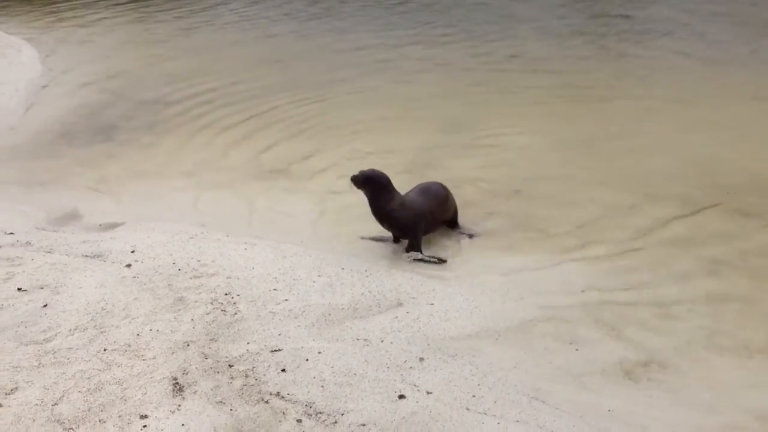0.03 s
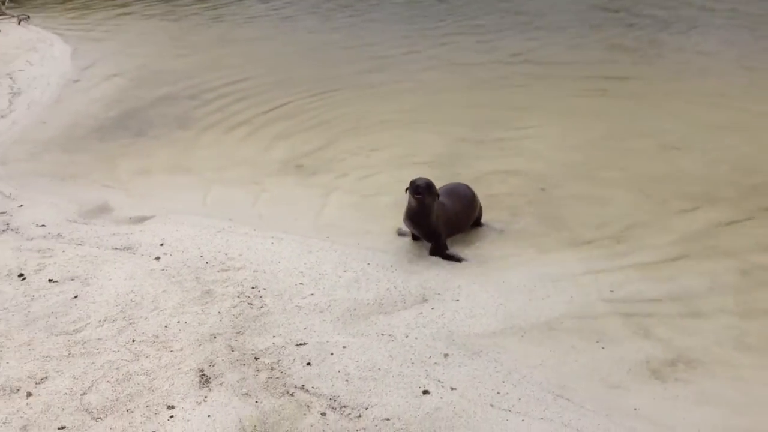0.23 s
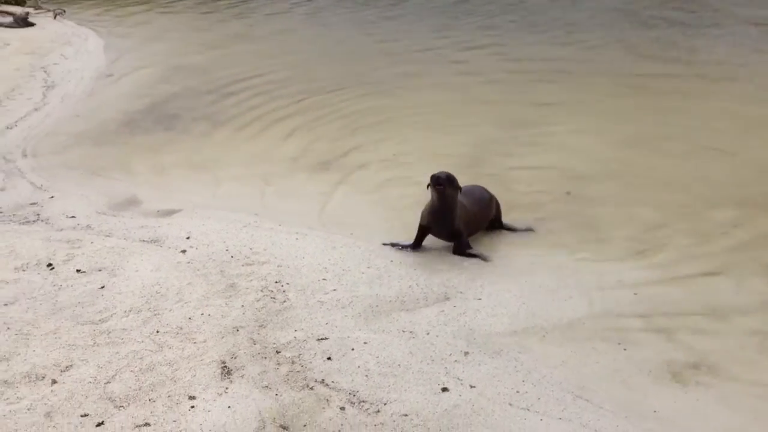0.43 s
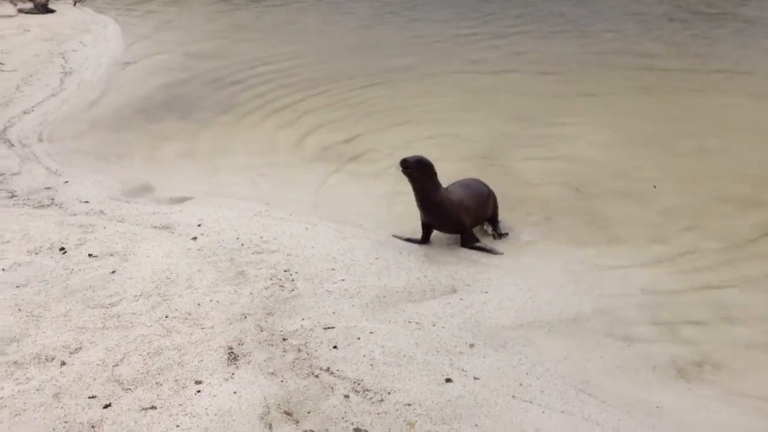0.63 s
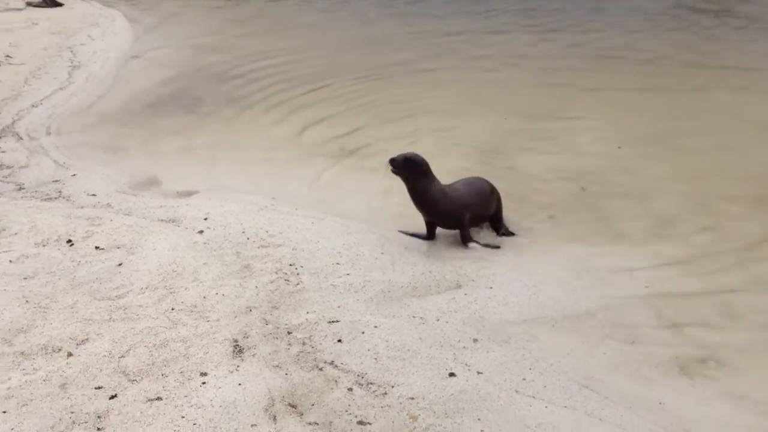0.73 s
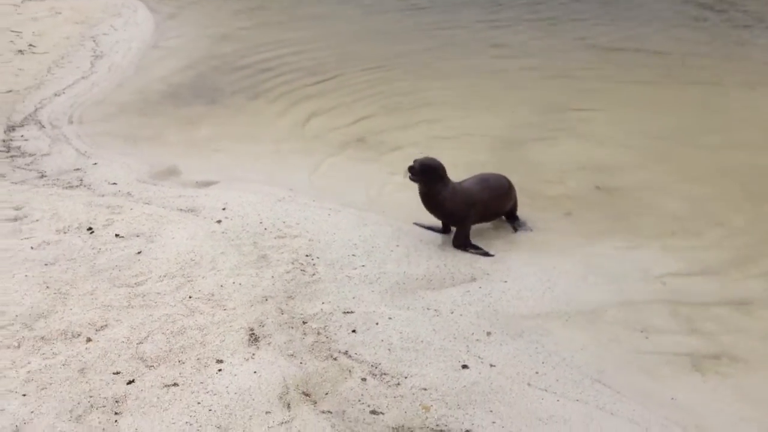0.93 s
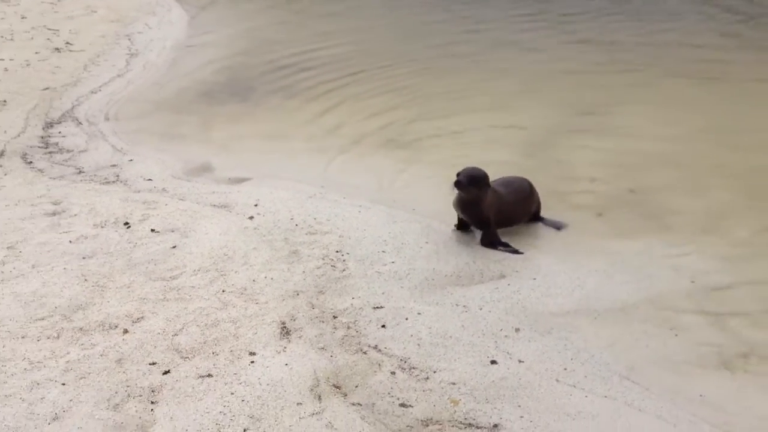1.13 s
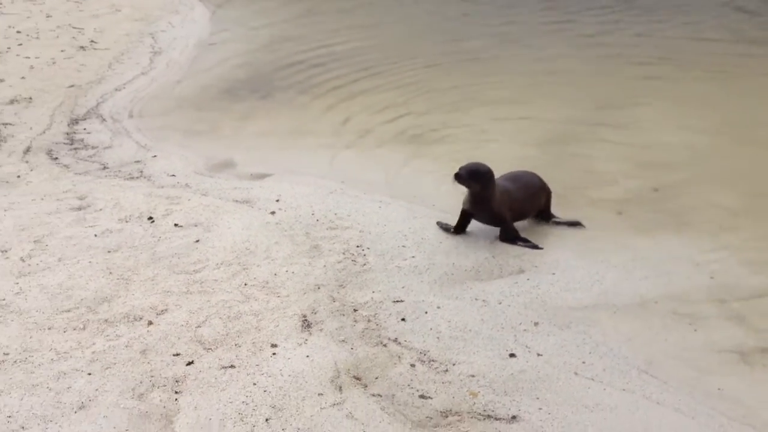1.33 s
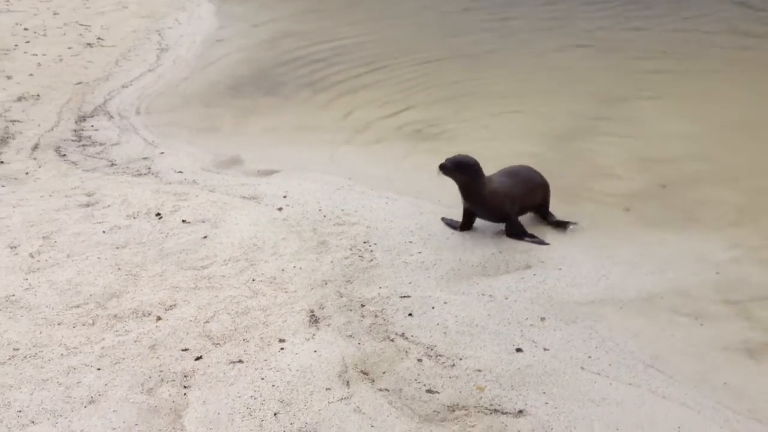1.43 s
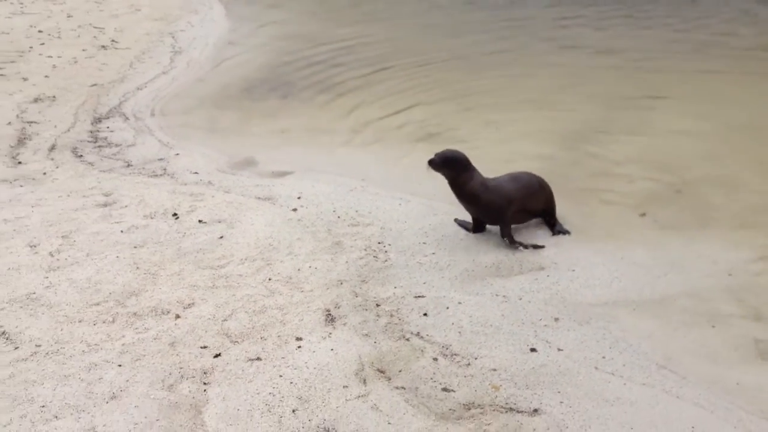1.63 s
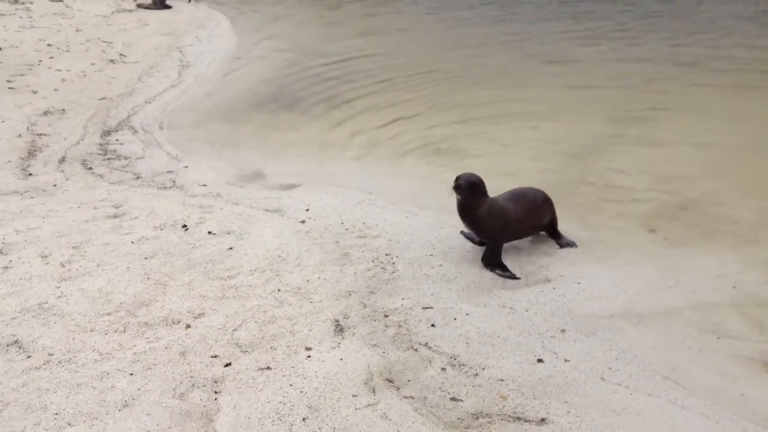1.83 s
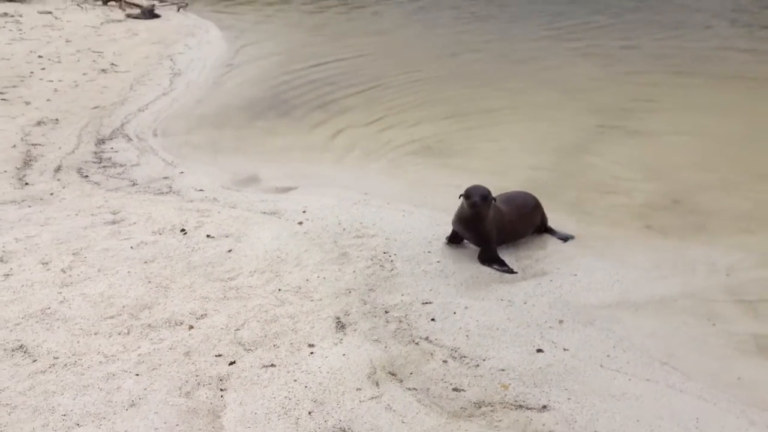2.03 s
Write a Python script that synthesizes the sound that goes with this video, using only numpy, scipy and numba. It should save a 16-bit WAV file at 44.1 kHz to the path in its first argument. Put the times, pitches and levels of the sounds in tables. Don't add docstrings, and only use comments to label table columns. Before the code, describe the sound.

After a tiny splash and drips, a young sea lion lets out one loud, nasal, goat-like bleat that turns hoarse and stops abruptly; soft watery swishes follow on a calm shore, low surf behind, pocket camera microphone.

```python
import sys
import numpy as np
from scipy import signal
from scipy.fft import rfft, irfft
from scipy.io import wavfile
from scipy.ndimage import uniform_filter1d, map_coordinates
from numba import njit

SR = 44100
rng = np.random.default_rng(int(sys.argv[2]) if len(sys.argv) > 2 else 0)


def master_out(mix):
    frames = np.transpose(np.atleast_2d(mix))
    ceiling = np.clip(frames, -1, 1)
    pcm = np.round(ceiling * 32767).astype(np.int16)
    wavfile.write(sys.argv[1], SR, pcm)


def elevation(decibels):
    levels = np.asarray(decibels, float)
    return 10 ** (levels / 20)


N = 92610


def unit(x):
    return x / np.sqrt(np.mean(x ** 2) + 1e-20)


def curves(rows, quiet=None):
    s, *cols = np.transpose(rows)
    t = np.arange(N) / SR
    cols = [np.interp(t, s, c) for c in cols]
    if quiet is not None:
        cols[quiet] = np.where((t < s[0]) | (t > s[-1]), -120, cols[quiet])
    return cols


def wobble(rate):
    return map_coordinates(rng.standard_normal(N // 50), [np.arange(N) * rate / SR])


def coloured(spectrum, patchy_db):
    hz, _, z = signal.stft(rng.standard_normal(N), SR, nperseg=1024)
    patches = uniform_filter1d(rng.standard_normal(z.shape), 8, 0)
    patches = unit(uniform_filter1d(patches, 4, 1))
    f, db = np.transpose(spectrum)
    shape_db = np.interp(np.log(hz + 1), np.log(f + 1), db)[:, None]
    _, noise = signal.istft(z * elevation(shape_db + patchy_db * patches), nperseg=1024)
    return unit(noise[:N])


def plinks(s, db, hz, t60, rise):
    t = np.arange(SR // 30)[None] / SR
    s, db, hz, t60 = (np.asarray(v)[:, None] for v in (s, db, hz, t60))
    envelope = elevation(db - 60 * t / t60) * (1 - np.exp(-t * hz / 2))
    ring = envelope * np.sin(2 * np.pi * hz * t * (1 + rise * t / t60))
    at = np.round((s + t) * SR).astype(int)
    return np.bincount(at.ravel(), ring.ravel(), N + SR)[:N]


def surf():
    # time in seconds, level in dB.
    swell = [ [(0.0, -46), (0.172, -46), (0.18, -47)], ][0] + [ [(1.1, -44), (1.16, -44), (1.544, -43),
             (1.916, -42), (2.1, -43.5)], ][0]
    # frequency in Hz, level in dB per Hz.
    roar = [(15, -79), (25, -16.5), (210, -0.5), (872, -20), (1080, -20), (1850, -23.5), (5020, -33.5),
            (12900, -39), (15500, -43)]
    db, = curves(swell)
    return elevation(db + 0.24 * wobble(8.2)) * coloured(roar, patchy_db=1.0)


def shallows():
    # start in seconds, length in seconds, fizz level in dB, airy spray level in dB.
    swishes = [
        (0.045, 0.21, -56, -105),
        (1.002, 0.23, -49, -54.5),
        (1.241, 0.49, -52, -55),
        (1.677, 0.2, -68, -51),
        (1.947, 0.15, -63, -57.5),
    ]
    # start in seconds, peak level in dB, pitch in Hz, decay by 60 dB in seconds.
    drips = [(.016, -39, 900, 0.033), (0.049, -34, 1530, 0.0092), (0.091, -37, 2680, 0.031),
             (0.093, -37, 5170, 0.0045), (0.098, -24, 990, 0.0087), (1.152, -23, 2034, 0.011),
             (1.165, -26, 357, 0.056), (1.178, -32.5, 2460, 0.011), (1.222, -29, 372, .05),
             (1.2444, -45, 4180, 0.014), (1.506, -31, 2720, 0.0059), (1.525, -34, 2720, 0.0077),
             (1.687, -27, 2560, 0.0048), (1.697, -23, 7800, 0.0012), (1.993, -41.5, 2480, .02)]
    # frequency in Hz, level in dB per Hz.
    fizz = [(900, 2), (1800, -5), (2800, 1.5), (4500, -7.5), (8700, -3), (15500, -59)]
    spray = [(3000, -34), (6000, 11.5), (12000, 5.5), (15500, 9.5)]
    bubbles_per_s, bubble_hz, bubble_db = 1200, 3000, -15

    t = np.arange(N) / SR
    swell = [np.sin(np.pi * np.clip((t - s) / length, 0, 1) ** 0.66) ** 2 for s, length, *_ in swishes]
    stir, air = elevation(np.transpose(swishes)[2:]) @ swell

    start, pitch, size, ringing = rng.random((round(bubbles_per_s * N / SR), 4)).T
    hz = bubble_hz * np.exp(1.94 * (pitch - .5))
    bubbles = plinks(start * N / SR, -2.5 * np.log(size), hz, (6 + 14 * ringing) / hz, rise=0.34)

    water = stir * (coloured(fizz, patchy_db=8) + elevation(bubble_db) * unit(bubbles))
    return water + air * coloured(spray, patchy_db=2.5) + plinks(*np.transpose(drips), rise=0.0094)


def squeak_and_moan():
    # start in seconds, length in seconds, from Hz, to Hz, level in dB.
    squeak_rows = [
        (.192, .024, 1380, 1610, -41),
        (.953, .03, 2060, 1970, -37),
        (1.038, .014, 1950, 1900, -39),
    ]
    # time in seconds, pitch in Hz, level in dB.
    moan = [(.43, 250, -54), (.47, 250, -47), (.54, 276, -45), (.588, 278, -36), (.66, 277, -40),
            (.70, 270, -49), (.74, 283, -44), (.81, 283, -46), (.88, 240, -52)]

    s, length, from_hz, to_hz, db = np.transpose(squeak_rows)[..., None]
    u = np.clip((np.arange(N) / SR - s) / length, 0, 1)
    hz = from_hz + (to_hz - from_hz) * np.clip(2 * u, 0, 1)
    envelope = elevation(db) * np.sqrt(np.abs(np.sin(np.pi * u))) * (u < 1)
    squeaks = envelope * np.sin(2 * np.pi * np.cumsum(hz, axis=1) / SR)

    low_hz, low_db = curves(moan, quiet=1)
    low = elevation(low_db + 1.2 * wobble(33.5)) * np.sin(2 * np.pi * np.cumsum(low_hz) / SR)
    return np.sqrt(2) * (squeaks.sum(axis=0) + low)


def whistle():
    # time in seconds, pitch in Hz, level in dB.
    held_line = [(.62, 684, -50), (.634, 735, -41), (.682, 752, -29), (.702, 770, -38), (.744, 756, -34),
                 (.768, 759, -41), (.784, 763, -35), (.808, 790, -50), (.832, 778, -39), (.856, 779, -42),
                 (.872, 769, -32.5), (.935, 771, -36)]
    falling_line = [(.952, 765, -32), (.966, 675, -41), (.978, 590, -37), (.99, 518, -35),
                    (1.002, 465, -36), (1.025, 428, -36), (1.048, 398, -35.5), (1.062, 385, -41),
                    (1.085, 378, -58)]
    # multiple of the pitch, dB while held, dB falling fast, dB at the end.
    overtones = [(2, -16, -3, 4), (3, -26, -8, 1), (4, -24, -14, -10), (5, -30, -16, -12),
                 (6, -40, -22, -15)]
    held_to_s, fast_s, catch_s, end_s, close_s, shut_s = .948, .96, .986, 1.008, 1.05, 1.075
    catch_db, shut_db = -13, -14

    hz, db = curves([*held_line, *falling_line], quiet=1)
    held, = curves([(held_to_s, 1), (fast_s, 0)])
    phase = 2 * np.pi * np.cumsum(hz * (1 + .011 * (0.27 + held) * wobble(60.35))) / SR
    level = elevation(db + 2.8 * held * wobble(55))

    tone = np.cos(phase)
    for multiple, held_db, fast_db, end_db in overtones:
        overtone_db, = curves([(held_to_s, held_db), (fast_s, fast_db), (catch_s, end_db + catch_db),
                               (end_s, end_db), (close_s, end_db), (shut_s, end_db + shut_db)])
        tone = tone + elevation(overtone_db + 0.42 * wobble(50.6)) * np.cos(round(multiple) * phase)

    closing_db, = curves([(close_s, 0), (shut_s, shut_db / 2)])
    puffs = unit(np.exp(2.7 * np.cos(phase)) * rng.standard_normal(N))
    puff_level = elevation(1 + 0.28 * wobble(63.8)) * level * (1 - held) * elevation(closing_db)
    return np.sqrt(2) * level * tone, puff_level * puffs


def buzz():
    # time in seconds, pulse rate in Hz, level in dB.
    clean = [(0.195, 204.5, -44), (0.249, 184.3, -40), (0.381, 198.3, -34.5), (0.401, 209.5, -35.5),
             (0.453, 205.1, -36), (0.607, 217, -34), (0.623, 221.8, -32)]
    rasp = [(0.637, 222.8, -28), (0.701, 220.8, -31.5), (0.738, 222.1, -33.5), (0.799, 213, -36),
            (0.872, 213.5, -35), (0.949, 211.6, -31), (0.966, 225.6, -28.5), (0.986, 219, -47),
            (0.998, 227.5, -46)]
    # time in seconds, roughness from 0 to 1.
    roughness = [(.19, .6), (.225, .22), (.26, .15), (.39, .13), (.405, .3), (.42, .13), (.61, .13),
                 (.635, .45), (.72, .52), (.78, .75)]
    onset_s, burst_s = .1905, .0013
    jitter, shimmer_db, lump_db = .25, 1, 1.8

    hz, db = curves([(onset_s, *clean[0][1:]), *clean, *rasp], quiet=1)
    rough, = curves(roughness)
    phase = np.cumsum(hz) / SR
    cycles = np.arange(1, int(phase[-1]))
    chance = rng.standard_normal((N // 100, 3))[:len(cycles)]
    at = np.interp(cycles, phase, np.arange(N))
    r = rough[at.astype(int)]
    at = np.clip(at + jitter * r ** 2 * chance[:, 0] * SR / hz[at.astype(int)], 8, N - 10)

    taps = np.floor(at)[:, None] + np.arange(-7, 9)
    offset = taps - at[:, None]
    kernel = np.sinc(offset) * np.cos(np.pi * offset / 16) ** 2

    def train(spread_db):
        return np.bincount(taps.astype(int).ravel(), (kernel * elevation(spread_db)[:, None]).ravel(), N)[:N]

    clicks = train(shimmer_db * chance[:, 1])
    clicks = unit(signal.lfilter(*signal.butter(4, 7500, fs=SR), clicks))

    t = np.arange(SR // 50) / SR
    gate = signal.fftconvolve(train(lump_db * r * chance[:, 2]), t * np.exp(-t / burst_s))[:N]
    bursts = unit(gate * rng.standard_normal(N))
    return elevation(db) * (np.sqrt(1 - rough) * clicks + np.sqrt(rough) * bursts)


@njit
def resonate(x, pole, turn, gain):
    y = np.zeros(len(x))
    for k in range(pole.shape[0]):
        a = b = 0.
        for n in range(2, len(x)):
            r = pole[k, n]
            a, b = (1 - r * r) / 2 * (x[n] - x[n - 2]) + 2 * r * turn[k, n] * a - r * r * b, a
            y[n] += gain[k, n] * a
    return y


def throat(x):
    # time in seconds, mouth shape (0 narrow, 1 drawn, 2 wide, 3 gaping).
    mouth = [(.19, 0.28), (.3, 0.086), (.42, 0.74), (.52, 1.03), (.62, 0.97), (.72, 1.1), (.82, 1.88),
             (.94, 1.93), (.97, 2.75), (1.0, 2.93)]
    # frequency in Hz, width in Hz, level in dB.
    narrow = [(525, 170, -7.5), (900, 64, 5), (1500, 350, -5.5), (1910, 71, 1), (2705, 150, -5.5),
              (3425, 85, -3), (4020, 117, 2), (5350, 810, -5), (7450, 200, -2), (9800, 1300, -19),
              (11700, 1500, -11.5), (13800, 2000, -19)]
    drawn = [(480, 190, -9.5), (734, 60, 6), (1460, 360, -5), (1752, 69, 4), (2570, 360, -6.5),
             (3153, 49, 9), (3810, 140, -2.5), (5730, 1560, -7), (7420, 1020, -7), (9800, 2000, -17),
             (11650, 1100, -15.5), (14400, 2000, -19)]
    wide = [(514, 150, -33), (900, 290, 3.5), (1490, 150, -1.5), (1670, 1430, -1.5), (3000, 660, -1),
            (3190, 150, 6), (4090, 510, -1), (5570, 2400, -9), (7340, 1600, -1), (9200, 1200, -10.5),
            (11070, 1400, -14), (14400, 3000, -24)]
    gaping = [(530, 143, -10), (1240, 650, -5), (1700, 300, -0.5), (2046, 45, 6), (2530, 200, -20),
              (3390, 260, 5), (4173, 1120, -0.5), (5870, 960, -8), (7340, 1400, -7), (9600, 1500, -8.5),
              (10650, 840, -9), (14000, 2400, -16)]
    signs = [1, 1, -1, 1, -1, 1, -1, 1, -1, 1, -1, 1]

    shape, = curves(mouth)
    shapes = np.array([narrow, drawn, wide, gaping])
    hz, width, db = (
        np.array([np.interp(shape, np.arange(len(shapes)), mode) for mode in shapes[..., column].T])
        for column in range(3))
    drift = np.array([[wobble(13.87), wobble(9.27)] for _ in signs])
    hz = hz * (1 + .01 * drift[:, 1])
    width = np.abs(width)
    gain = elevation(db + 1.4 * drift[:, 0]) * np.array(signs)[:, None]
    gain /= np.sqrt(np.sum(gain ** 2 * width * np.pi / SR, 0))
    return resonate(x, np.exp(-np.pi * width / SR), np.cos(2 * np.pi * hz / SR), gain)


def mirrored(x, from_hz, ms):
    bright = signal.sosfiltfilt(signal.butter(3, from_hz, "high", fs=SR, output="sos"), x)
    return map_coordinates(bright, [np.arange(N) - ms * SR / 1000], order=5)


def off_water(x):
    # time in seconds, extra path in ms, mirror level in dB.
    bounce = [(.19, .715, -9), (.3, .715, -6), (.42, .747, -4), (.5, .778, -1), (.62, .814, -2),
              (.7, .807, -1), (.76, .783, -3), (.85, .725, -3), (1.02, .70, -1)]
    ripple_db = 2.5
    ms, db = curves(bounce)
    water_gain = elevation(np.minimum(db + ripple_db * wobble(14), 0))
    water = water_gain * mirrored(x, 3600, ms + .004 * wobble(18))
    sand_gain = elevation(-5 + ripple_db * wobble(10))
    sand = sand_gain * mirrored(x, 6500, .72 * ms + .03 * wobble(6))
    return x + water + sand


def scene():
    tone, puffs = whistle()
    pup = off_water(throat(buzz() + puffs)) + tone
    echo_db, echo_t60 = -14, .1
    t = np.arange(SR // 4) / SR
    tail = rng.standard_normal(len(t)) * elevation(-60 * t / echo_t60) * (t > .004)
    shore = elevation(echo_db) * signal.fftconvolve(pup, tail / np.linalg.norm(tail))[:N]
    return (pup + shore + squeak_and_moan() + shallows() + surf())[None]


def top_cut(x):
    return signal.sosfilt(signal.butter(12, 15680, fs=SR, output="sos"), x)


def record(dry):
    cut = signal.sosfilt(signal.butter(3, 148.6, "high", fs=SR, output="sos"), dry)
    cut = irfft(rfft(cut) * (np.fft.rfftfreq(N, 1 / SR) < 15400), N)
    return top_cut(cut)


dry = scene()
out = record(dry)
master_out(out)
```